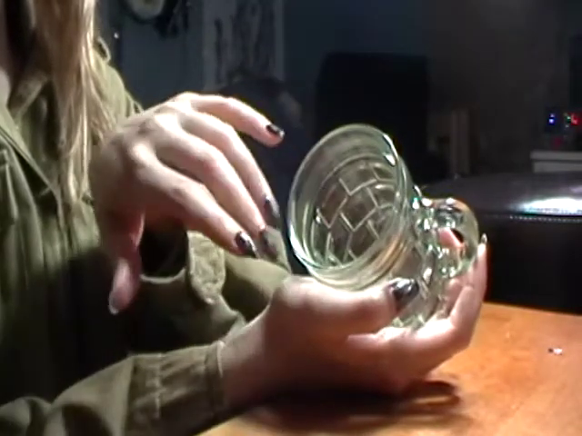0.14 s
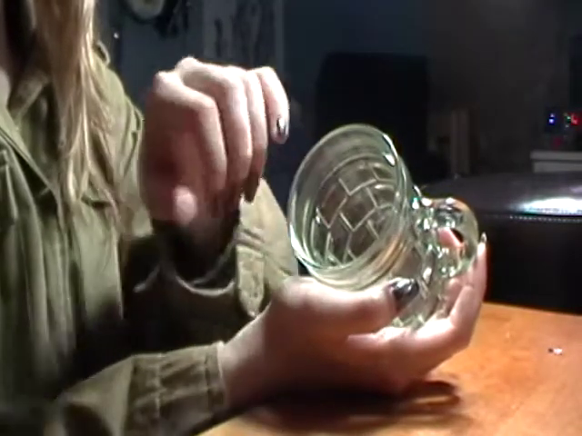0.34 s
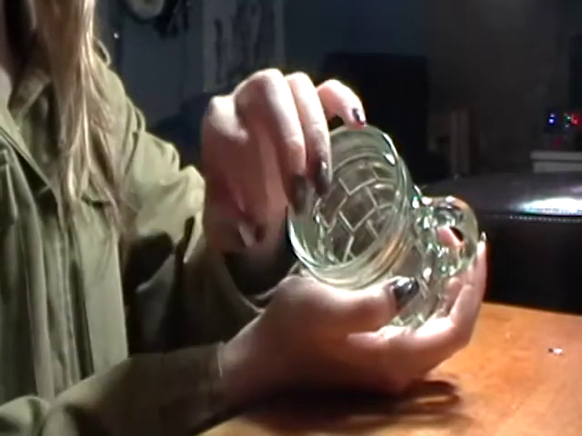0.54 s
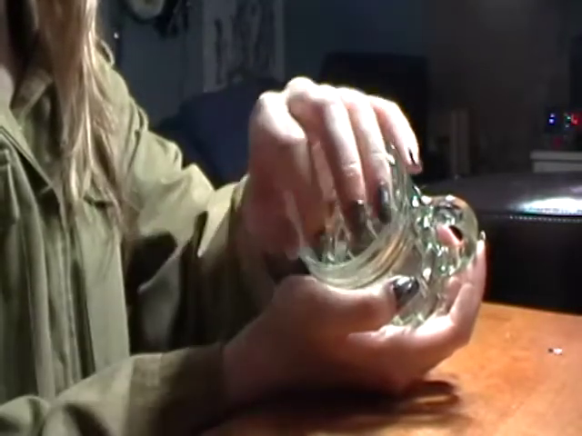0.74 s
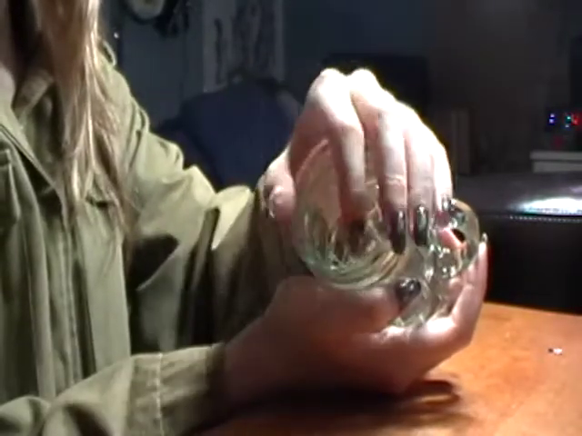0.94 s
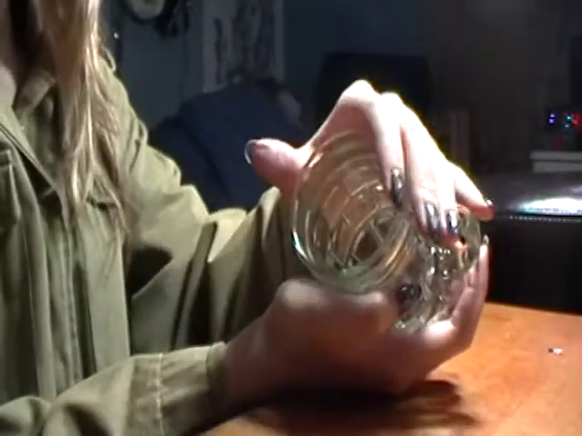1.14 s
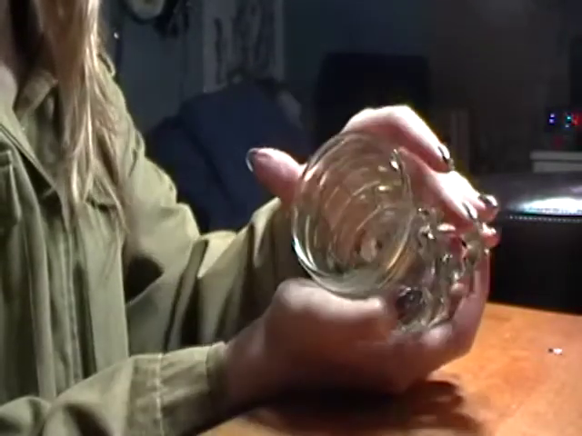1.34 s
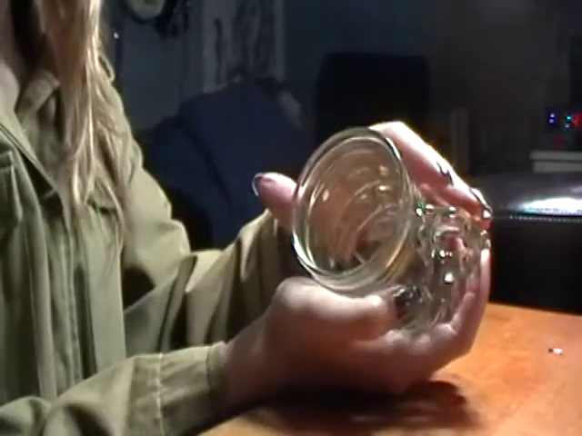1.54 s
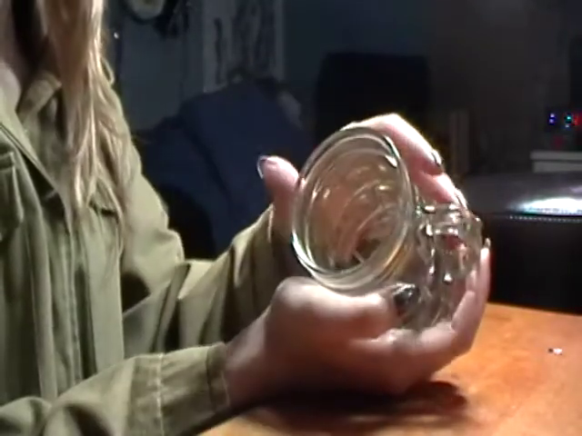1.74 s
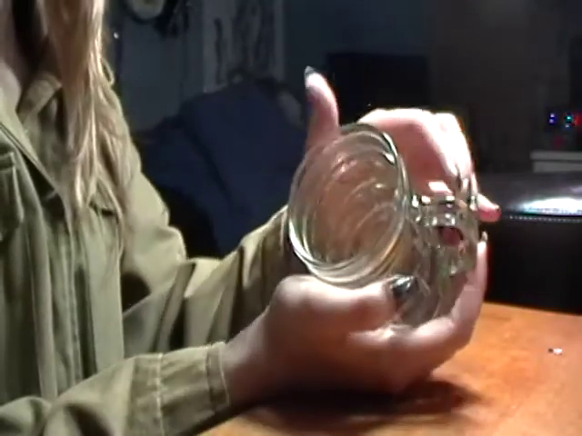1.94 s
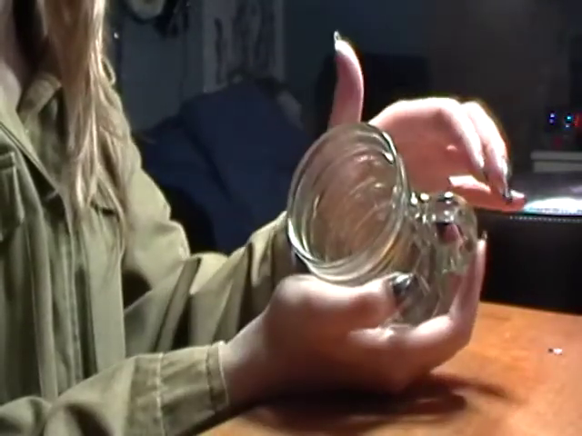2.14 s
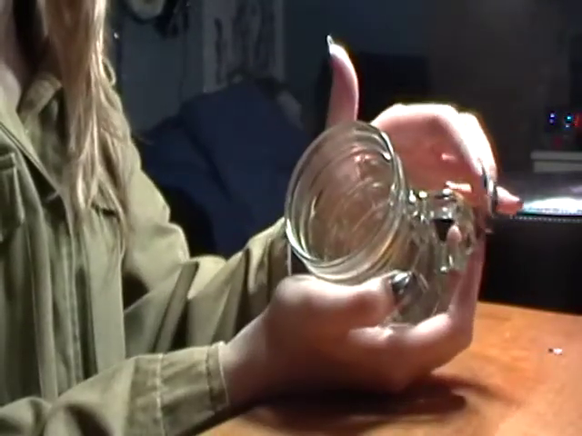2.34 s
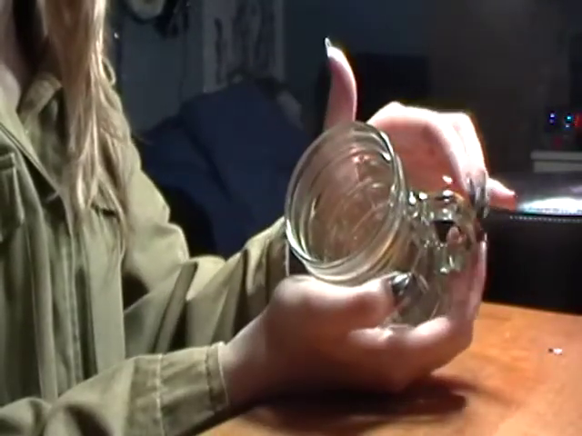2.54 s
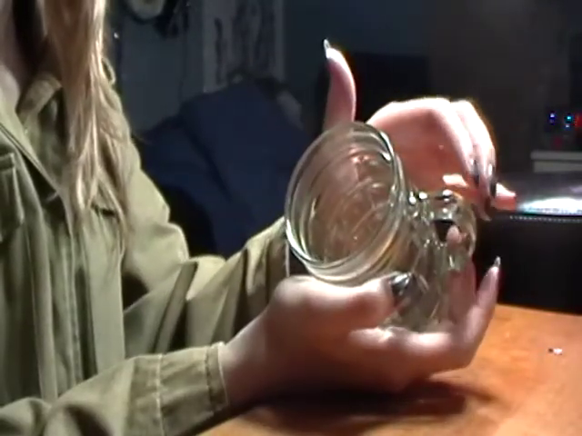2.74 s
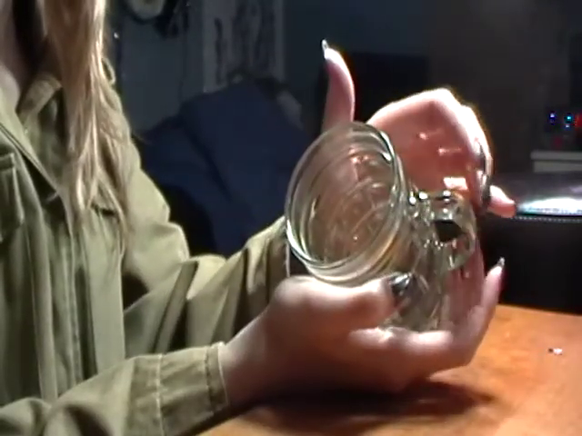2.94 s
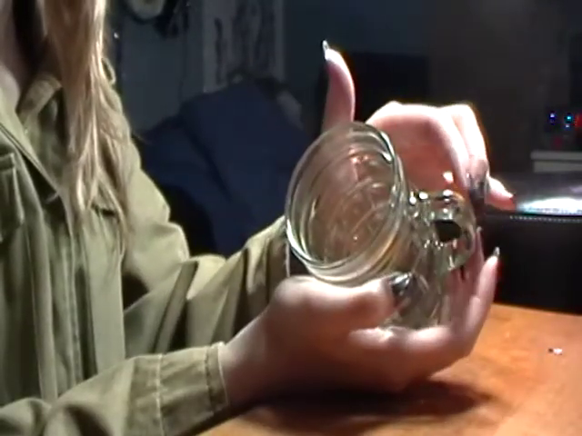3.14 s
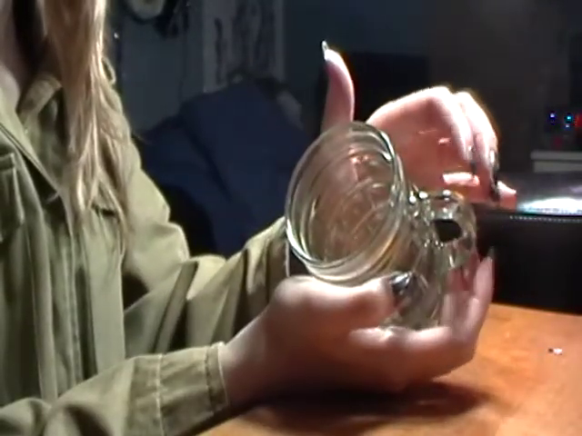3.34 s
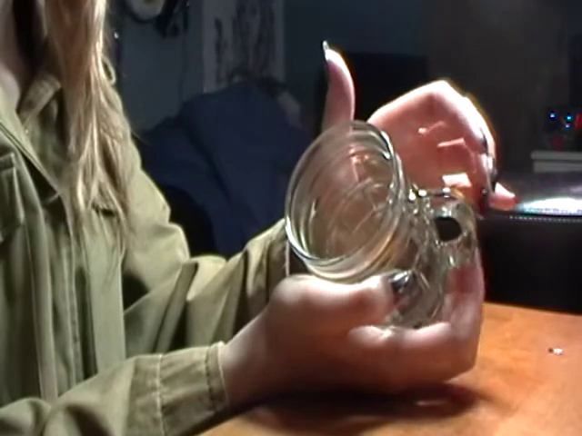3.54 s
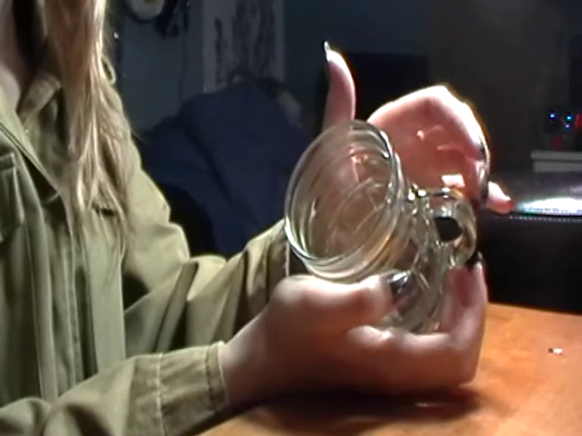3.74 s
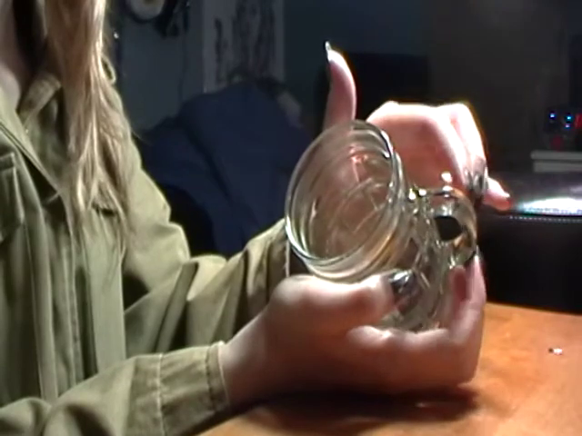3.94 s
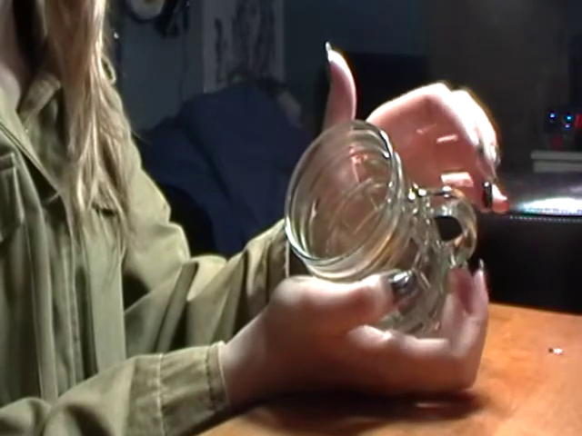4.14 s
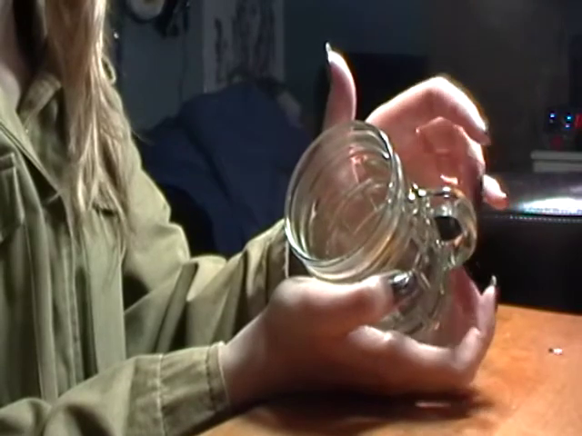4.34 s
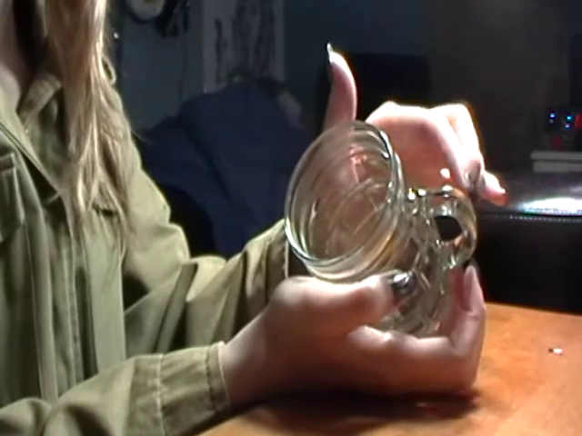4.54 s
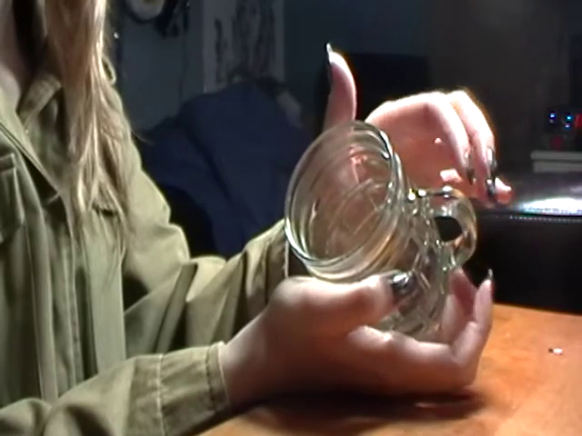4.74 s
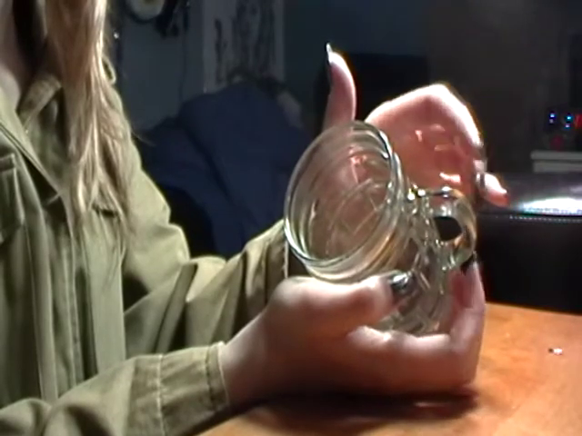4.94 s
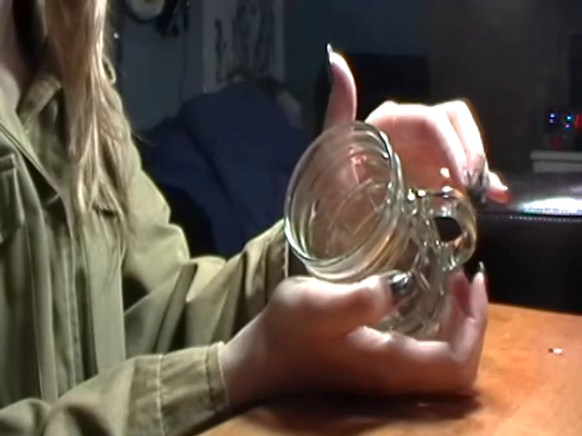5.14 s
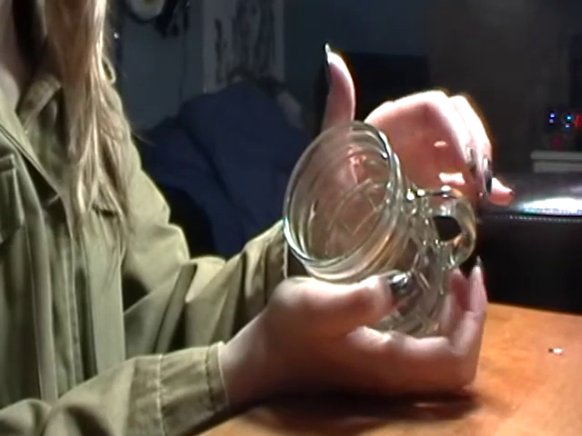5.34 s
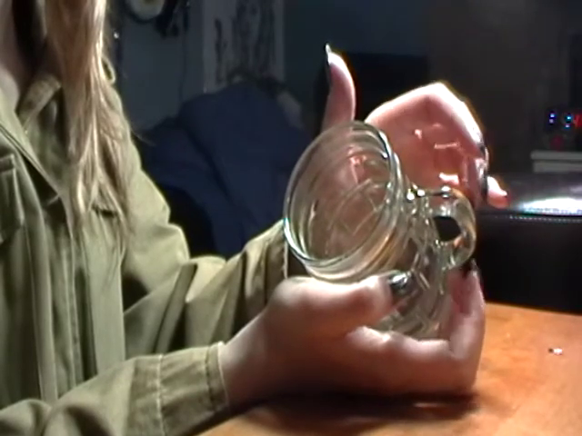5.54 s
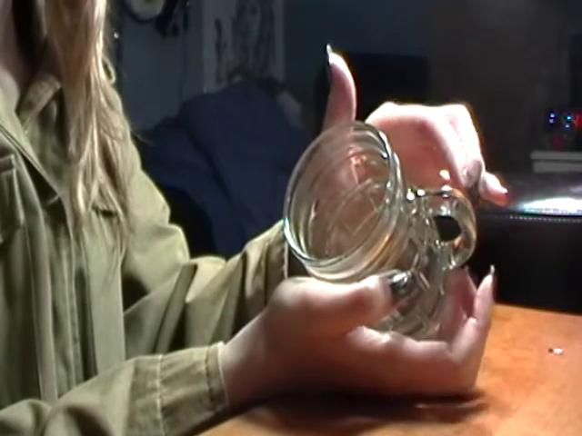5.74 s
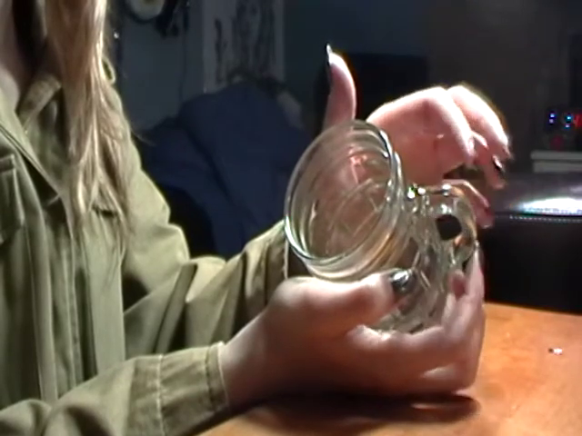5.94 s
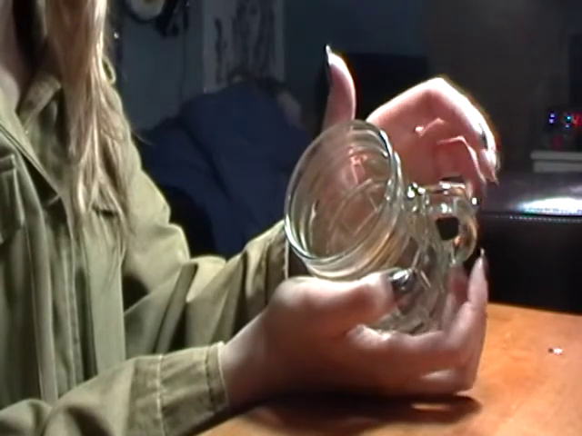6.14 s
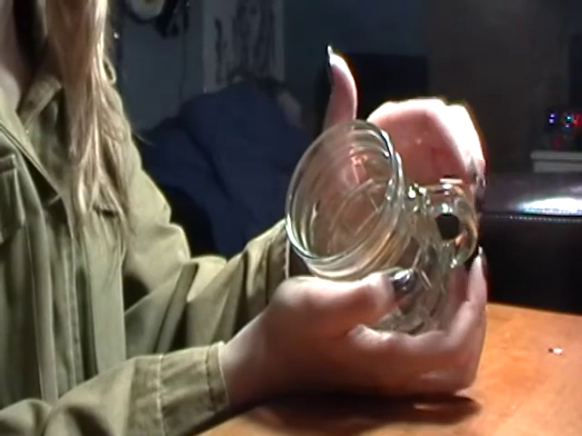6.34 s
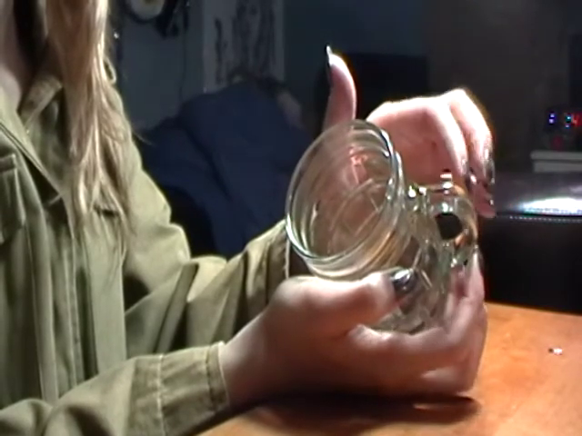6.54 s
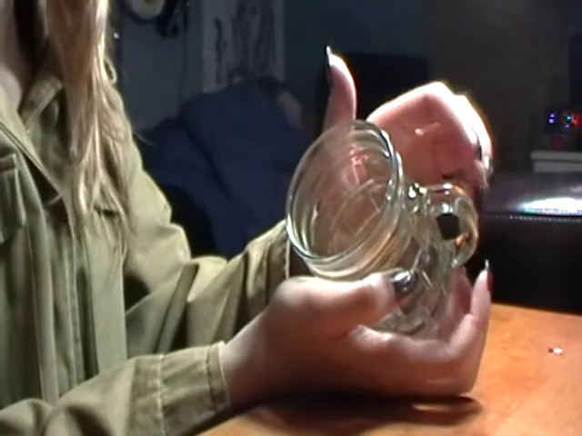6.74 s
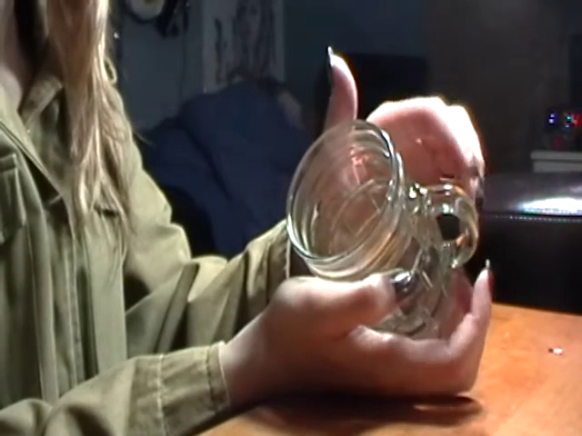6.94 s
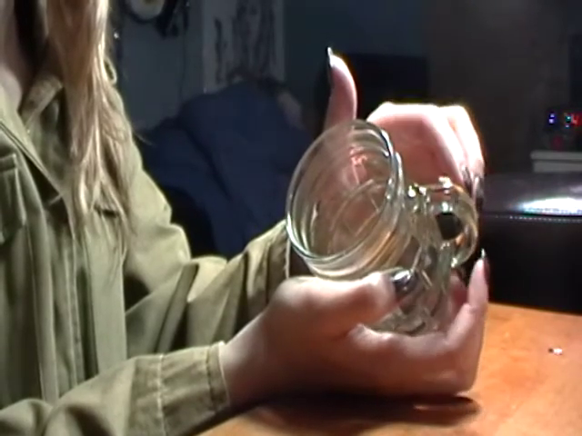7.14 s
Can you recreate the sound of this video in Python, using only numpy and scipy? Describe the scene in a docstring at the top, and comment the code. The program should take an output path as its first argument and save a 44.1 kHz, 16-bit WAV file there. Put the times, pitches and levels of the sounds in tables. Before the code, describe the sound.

A close, intimate stereo sound of long fingernails playing on a thick glass mug cradled in one hand above a wooden desk. At the very start, three tiny clicks catch the rim. From about 0.6 to 1.7 seconds the nails slide softly along the glass with a fine, grainy hiss and faint singing rim, while a sleeve rustles quietly. A brushing tick comes near 1.8, and a light double tick at 2.5. The first strong clink lands at 2.9, then softer taps ring the rim a little. From 3.75 the drumming is brisker and irregular, with bright hard clinks around 4.2, 4.8, 5.0, 5.4, 5.6, 6.8 and 7.2, the loudest at 5.6, between small clicks and dull fingertip pats. Rings are high, glassy and cut short. Small-room reflections sit over quiet air, a slowly swelling low hum and a thin high whine.

```python
"""Long fingernails drum on a thick glass mug cradled in one hand, and slide over it, above a wooden desk.
Each blow mixes a filtered contact click, a dull knock and decaying sine modes for the hand-damped glass.
The slide is a stream of tiny random slips through resonances; a sleeve rustles as shaped noise.
Discrete echoes and a noise tail give the desk and small room, over coloured air, hum and thin whine."""
import sys
import numpy as np
from scipy import signal
from scipy.fft import rfft, irfft
from scipy.io import wavfile

SR = 44100
rng = np.random.default_rng(int(sys.argv[2]) if len(sys.argv) > 2 else 0)


def dump_mix(stems):
    """Bounce the given channels to the path in sys.argv[1] as a 16-bit WAV at rate SR."""
    frames = np.atleast_2d(stems).T  # one column per channel
    limited = np.clip(frames, -1, 1)  # hard clip at full scale
    pcm = np.round(limited * 32767).astype(np.int16)
    wavfile.write(sys.argv[1], SR, pcm)


N = 321048
T = np.arange(N) / SR  # seconds

# Room air shared by both sides. Each row: frequency in Hz, relative level in dB.
AIR_MID = [(15, -63), (25, -57), (52, -5), (123, -1.5), (149, -4.5), (217, -10), (249, -12), (373, -12.5),
           (818, -24.5), (1790, -20.5), (3620, -20.5), (3920, -17), (4250, -19.5), (6050, -21),
           (16000, -38)]
# Background noise opposed between the sides. Each row: frequency in Hz, relative level in dB.
AIR_SIDE = [(15, -51), (25, -21), (92, -7.5), (285, -6), (416, -10.5), (489, -8.5), (591, -9.5), (936, -18),
            (1020, -19), (1560, -15.5), (4030, -24.5), (9840, -37.5), (11300, -36), (14800, -48),
            (16000, -38)]
AIR_MID_DB, AIR_SIDE_DB = -66.5, -61.5
# Hum and whine, lowest tone first. Each row: frequency in Hz, mean level in dB.
HUM = [(120, -71.5), (216, -79), (3896, -82.5), (3926, -81.5), (3956, -82.5), (5873, -84.5)]
# The lowest hum slowly swells and sinks.
HUM_PERIOD_S, HUM_CREST_S, HUM_SWELL_DB = 3.08, 1.46, 3

# Nearby surfaces, the desk first. Each row: nominal delay in seconds, level in dB.
ECHOES = [(.0017, -17.5), (.0082, -15), (.0178, -15), (.0245, -26.5)]
# Diffuse room tail; the width is the side-to-mid amplitude ratio.
ROOM_T60_S, ROOM_DB, ROOM_WIDTH = 0.3, -15.5, 0.2

# Shifts of the sleeve. Each row: centre in seconds, length in seconds, level in dB.
SLEEVE = [(.76, 0.36, -75), (1.65, 0.52, -73), (2.3, 0.29, -75), (5.1, 0.48, -78), (7.2, 0.18, -68.5)]

# Short skids of a nail. Each row: centre in seconds, length in seconds, level in dB.
SKIDS = [(.02, 0.076, -72.5), (1.655, 0.03, -68.5), (1.779, 0.025, -58.5), (3.272, 0.014, -64),
         (4.44, 0.014, -62.5), (7.208, 0.023, -65)]
# Glass resonances under a sliding nail. Each row: frequency in Hz, width in Hz, relative level in dB.
SLIDE_MODES = [(714, 54, 3), (2880, 110, 3), (5780, 81, 7.5), (6870, 84, 4), (7700, 130, -1),
               (7900, 110, -6), (8622, 32, -20), (10260, 40, -13), (6400, 1200, -5)]
# Rim tones that sing as the nails pass near. Each row: frequency in Hz, width in Hz, relative level in dB.
RIM_MODES = [(2624, 36, -1), (2796, 56, 0)]
# The nails slide once along the glass; the rim stops singing as they leave it.
SLIDE_START_S, SLIDE_END_S, SING_END_S = 0.61, 1.676, 1.424
SLIDE_ATTACK_S, SLIDE_RELEASE_S, SING_RELEASE_S = 0.13, 0.21, 0.2
SLIDE_DB, SING_DB = -67.5, -71

# Finger blows. Each row: start in seconds, kind of touch, strength in dB, hardness of the contact in dB.
TAPS = [(0.042, "rim", -63.5, -7.5), (.063, "rim", -55, 5), (.107, "rim", -61, -10),
        (0.701, "pad", -61, -17), (1.492, "pad", -64.5, 2), (1.646, "glance", -61, 11),
        (1.661, "glance", -62, 14), (1.784, "glance", -44.5, -23), (2.5173, "tip", -53.5, -2),
        (2.537, "tip", -52.5, 0.5), (2.8802, "square", -36, 1.5), (3.0156, "tip", -43.5, -2),
        (3.1457, "tip", -57, -1.5), (3.2798, "glance", -49.5, 5), (3.559, "tip", -78, 12),
        (3.753, "square", -36, -6), (3.8198, "square", -38, 5), (3.894, "full", -57.5, 0),
        (3.9353, "full", -48.5, 7.5), (4.2277, "flick", -29, -0.5), (4.2802, "pad", -56.5, 2),
        (4.361, "tip", -44, -3), (4.442, "glance", -57, -1), (4.4892, "glance", -48, -3),
        (4.5493, "tip", -49.5, -4), (4.7505, "pad", -56, 2), (4.832, "square", -27.5, 0),
        (4.8929, "full", -47, 1.5), (4.9867, "square", -31, 4), (5.1011, "tip", -46, -2),
        (5.233, "pad", -60, 1), (5.3917, "square", -30.5, 1), (5.423, "glance", -43, -2),
        (5.6233, "flick", -25.5, 3), (5.718, "tip", -54, 1.5), (5.8453, "pad", -55.5, -6),
        (5.9201, "tip", -59, 3), (6.1635, "glance", -48.5, 0), (6.2973, "full", -49.5, -2.5),
        (6.393, "tip", -46, 1), (6.428, "square", -42.5, 7.5), (6.695, "glance", -61, 0),
        (6.7869, "flick", -26.5, -2.5), (6.8361, "tip", -47.5, -1.5), (6.922, "pad", -61.5, -24),
        (7.0074, "full", -54, 3.5), (7.2198, "square", -34.5, 11)]
# How each touch drives the sound. Each entry, by name: dull knock in dB, nail click in dB,
# nail edge in dB, rim ring in dB, wall ring in dB, base ring in dB, ring length factor.
# square: nail lands flat on the wall; flick: springs straight back, nearly all ring;
# tip: point of the nail; full: nail and fingertip together; glance: nail brushes past;
# pad: fleshy fingertip; rim: nail catches the lip.
TOUCHES = {"square": (-30.5, -19, -25.5, -35.5, -0.5, -9.5, 1.23),
           "flick": (-33, -23, -30, -42, -1, -10, 1.2), "tip": (-31.5, -10, -13, -25, 0, -6, 1.1),
           "full": (-17, -9.5, -11.5, -19.5, 0, -7.5, 1),
           "glance": (-28, -16.5, -32, -26.5, 0, -11.5, 1.65), "pad": (0, -4.5, -15, -17, -20, -22, .85),
           "rim": (-8, -4.5, -25, 0.5, -13.5, -6, 1)}
# A harder contact is brighter. Each entry, by part of the blow: share of the hardness in dB it gains.
BRIGHTENS = {"click": .3, "edge": 1, "base": .28}
# The holding hand damps the glass more or less. Each row: time in seconds, ring length factor.
GRIP = [(2.9, 1.05), (4.8, 1.15), (5.62, 0.88), (6.2, 0.98), (7.2, 1.08)]
# The taps ring the rim more and more up to 3.2 s, then much less as they land lower on the wall.
# Each row: time in seconds, extra rim ring in dB.
NEAR_RIM = [(1.8, 4), (3.2, 16.5), (3.75, 1.5), (7.2, -1)]
# Modes of the held mug. Each row: part of the blow that drives it, nominal frequency in Hz,
# nominal level in dB, nominal 60 dB decay in seconds, left minus right in dB.
MUG = [("knock", 770, 7.5, .045, 0), ("rim", 2618, 2, .15, -1), ("click", 2795, -9, .07, -1),
       ("click", 3655, -11, .05, 0), ("wall", 5756, 7, .061, -1.8), ("click", 6992, 13, .045, 0),
       ("base", 7838, -4, .055, 0), ("base", 8147, 6, .042, 0), ("base", 8622, -13, .06, 0),
       ("edge", 10258, 7.5, .05, 1), ("edge", 11305, -3, .05, -1), ("edge", 12420, 0, .06, 0),
       ("edge", 13170, -13, .06, 0), ("edge", 14150, -12, .06, 0)]
STRIKE_SPREAD_DB = 2
PHASE_PER_HZ = 2e-5  # radians of left-right phase spread per Hz
# Colour of the contact itself. Each row: part of the blow, frequency in Hz, level in dB.
CONTACT = [("knock", 310, 20.4), ("knock", 970, 37.7), ("knock", 980, 33), ("click", 1950, 30.8),
           ("click", 2800, 30.6), ("click", 5200, 34.16), ("click", 5400, 40.6), ("edge", 9700, 34.6),
           ("edge", 10600, 31.5), ("edge", 15700, 22)]

TOP_HZ = 16000


def undb(db):
    """Decibels to gain."""
    return 10 ** (np.asarray(db) / 20)


def unit(x):
    """Scale to rms 1."""
    return x / np.sqrt(np.mean(x ** 2))


def contour(points, size):
    """Gain per frequency bin, drawn through (Hz, dB) points on a log frequency scale."""
    hz, db = np.transpose(sorted(map(tuple, points)))
    bins_hz = np.fft.rfftfreq(size, 1 / SR) + 1
    return undb(np.interp(np.log(bins_hz), np.log(hz), db))


def noise(points):
    """Coloured noise of rms 1."""
    white = rfft(rng.standard_normal(N))
    return unit(irfft(white * contour(points, N), N))


def pulse(points, size=2048):
    """Minimum-phase pulse: the sharpest causal attack with this colour."""
    cepstrum = irfft(np.log(contour(points, size)))
    # fold the cepstrum forward in time
    cepstrum[1:size // 2] *= 2
    cepstrum[size // 2 + 1:] = 0
    return irfft(np.exp(rfft(cepstrum)))


def walk(rate):
    """Slow random line with a spread near 1, heading for a new value rate times a second."""
    count = int(T[-1] * rate) + 2
    return np.interp(T * rate, np.arange(count), rng.standard_normal(count))


def swells(rows):
    """Smooth bell-shaped rise and fall for each (centre, length, dB)."""
    return sum(undb(db) * np.exp(-2 * ((T - s) / length) ** 2) for s, length, db in rows)


def stroke(start, end, attack, release):
    """Attack, hold and release between two times."""
    rise = (T - start) / attack
    fall = (end - T) / release
    return np.clip(np.minimum(rise, fall), 0, 1)


def add(out, s, sound):
    """Mix a sound in at a time in seconds."""
    i = max(int(s * SR), 0)
    out[..., i:i + sound.shape[-1]] += sound[..., :N - i]


def background(waver=0.28, swell_db=1.5):
    """Steady coloured air with slightly wavering hum and whine; the lowest tone swells in a slow cycle."""
    mid = undb(AIR_MID_DB) * noise(AIR_MID)
    side = undb(AIR_SIDE_DB) * noise(AIR_SIDE)
    slow_db = HUM_SWELL_DB * np.cos(2 * np.pi * (T - HUM_CREST_S) / HUM_PERIOD_S)
    for k, (hz, db) in enumerate(HUM):
        drift_db = swell_db * walk(1.98) if k else slow_db
        tone = np.sin(2 * np.pi * hz * T + waver * walk(5))
        mid = mid + np.sqrt(2) * undb(db + drift_db) * tone
    return np.array([mid + side, mid - side])


def room(x, gap_s=0.0059):
    """Short diffuse tail of decaying noise, partly different on each side and drawn anew for each call."""
    t = T[:SR // 3]
    fade = np.exp(-np.log(1000) * t / ROOM_T60_S) * (t > gap_s)
    mid, side = rng.standard_normal((2, len(t))) * fade / np.linalg.norm(fade)
    tail = np.array([mid + ROOM_WIDTH * side, mid - ROOM_WIDTH * side])
    wet = signal.fftconvolve(np.atleast_2d(x), tail, axes=1)
    return undb(ROOM_DB) * wet[:, :x.shape[-1]]


def sleeve(crumple_db=3):
    """Soft cloth rustle: coloured noise with an uneven level."""
    cloth = noise([(80, -19), (300, 0.0), (700, -1.0), (1200, -23.5), (4000, -12), (14000, -41)])
    return swells(SLEEVE) * undb(crumple_db * walk(30)) * cloth


def rubbed(slips, modes, wander_db=3):
    """A spectrum of slips through resonances that come and go as the nails travel; rms 1."""
    f = np.fft.rfftfreq(N, 1 / SR) + 1
    total = 0
    for hz, width, db in modes:
        resonance = 1 / (1 + 1j * (f / hz - hz / f) * hz / width)
        total = total + undb(db + wander_db * walk(11)) * irfft(slips * resonance, N)
    return unit(total)


def sliding(grain_db=2.1, rasp_db=-4):
    """Dense tiny slips of the nails excite the glass; the rim sings and short skids rasp."""
    slip_db = grain_db * rng.exponential(size=N) + 1.5 * walk(70)
    slips = rfft(rng.standard_normal(N) * undb(slip_db))
    body = rubbed(slips, SLIDE_MODES)
    hiss_level = undb(SLIDE_DB) * stroke(SLIDE_START_S, SLIDE_END_S, SLIDE_ATTACK_S, SLIDE_RELEASE_S)
    sing_level = undb(SING_DB) * stroke(SLIDE_START_S, SING_END_S, SLIDE_ATTACK_S, SING_RELEASE_S)
    slide = hiss_level * body + sing_level * rubbed(slips, RIM_MODES)
    # a skid presses harder, so the nail itself rasps too
    rasp_colour = contour([(1500, -22), (3000, 5), (5500, 8), (8500, -24), (11000, -29)], N)
    rasp = unit(irfft(slips * rasp_colour, N))
    return slide + swells(SKIDS) * (body + undb(rasp_db) * rasp)


def strike(s, touch, db, hardness):
    """How strongly one tap drives each part of the sound, and how long the hand lets it ring."""
    *parts, length = TOUCHES[touch]
    blow = {}
    for part, part_db in zip(("knock", "click", "edge", "rim", "wall", "base"), parts):
        blow[part] = db + part_db + BRIGHTENS.get(part, 0) * hardness
    blow["rim"] += np.interp(s, *np.transpose(NEAR_RIM))
    return blow, length * np.interp(s, *np.transpose(GRIP))


def contact(blow, chatter_db=-5, chatter_s=0.0051):
    """One sharp click, then a few milliseconds of decaying noise buzz in the nail."""
    t = T[:1024]
    buzz = rng.standard_normal(len(t)) * np.exp(-t / chatter_s)
    click = pulse([(hz, blow[part] + db) for part, hz, db in CONTACT])
    chatter = signal.fftconvolve(click, buzz / np.linalg.norm(buzz))[:len(click)]
    return click + undb(chatter_db) * chatter


def ring(blow, length, build_s=0.001, detune_ratio=0.00064):
    """The mug's modes as decaying sines, with small chance shifts of pitch, level and phase per blow."""
    t = T[:SR // 3]
    sides = np.array([[1], [-1]])
    out = 0
    for part, hz, db, t60, pan_db in MUG:
        detune, skew, place, start = rng.standard_normal(4)
        phase = 2 * np.pi * (hz * (1 + detune_ratio * detune) * t + start)
        # shorter waves differ more between left and right
        phase = phase + sides * skew * PHASE_PER_HZ * hz
        mode_db = db + blow[part]
        # the nail lands nearer to or further from the nodes of the lesser modes
        if part in ("click", "base", "edge"):
            mode_db = mode_db + STRIKE_SPREAD_DB * place
        decay = np.exp(-np.log(1000) * t / (t60 * length))
        out = out + undb(mode_db + sides * pan_db / 2) * decay * np.sin(phase)
    return out * (1 - np.exp(-t / build_s))


def taps(sway=0.048):
    """Every blow gives a click and a ring; their echoes shift as the mug sways in the hand."""
    out = np.zeros((2, N))
    for s, touch, db, hardness in TAPS:
        blow, length = strike(s, touch, db, hardness)
        tone = ring(blow, length)
        click = contact(blow)
        tap = tone + np.pad(click, (0, tone.shape[1] - len(click)))
        add(out, s, tap + room(tap))
        for k, (delay, echo_db) in enumerate(ECHOES):
            # the desk returns only the click, as the ring's build-up already holds its echo;
            # later echoes return the whole tap and ripple its decay
            reflected = tap if k else click
            echo_s = s + delay * (1 + sway * rng.standard_normal())
            add(out, echo_s, undb(echo_db) * reflected)
    return out


def scene():
    """Hands and mug close by, in the room."""
    handling = sliding() + sleeve()
    return taps() + handling + room(handling) + background()


def record(dry):
    """The recorder cuts the top with a steep elliptic low-pass."""
    low_pass = signal.ellip(10, .2, 70, TOP_HZ, fs=SR, output="sos")  # 0.2 dB ripple, 70 dB stop band
    return signal.sosfilt(low_pass, dry)


dry = scene()
out = record(dry)
dump_mix(out)
```